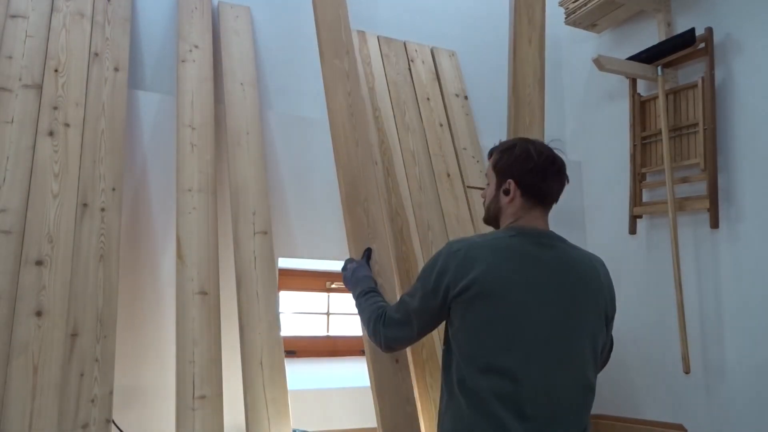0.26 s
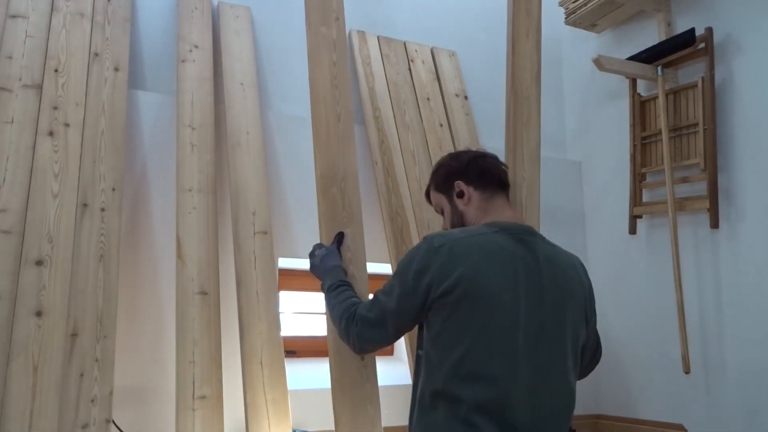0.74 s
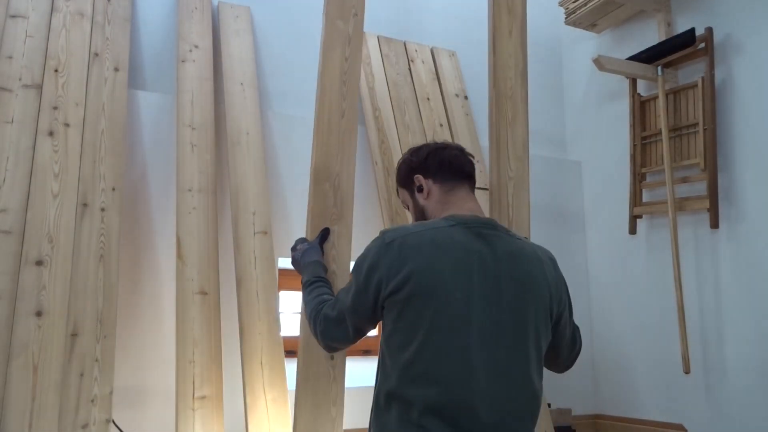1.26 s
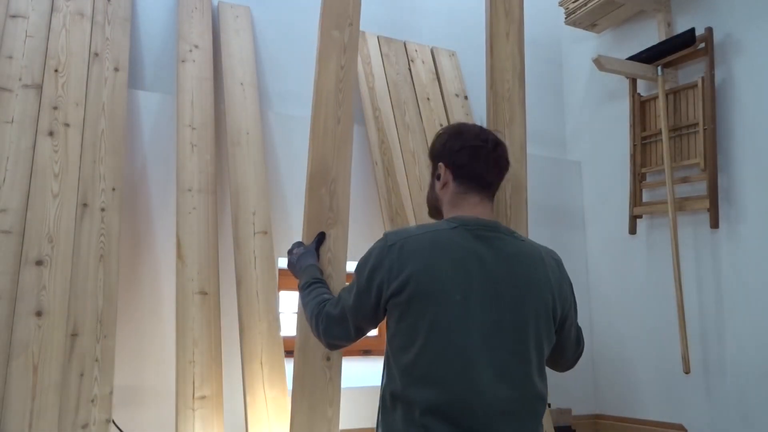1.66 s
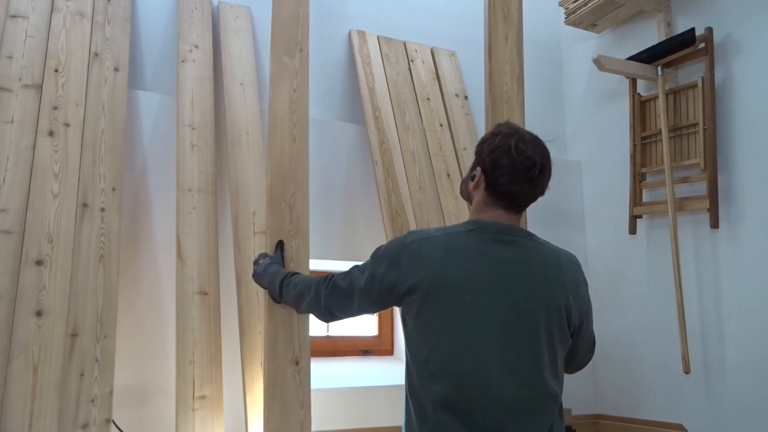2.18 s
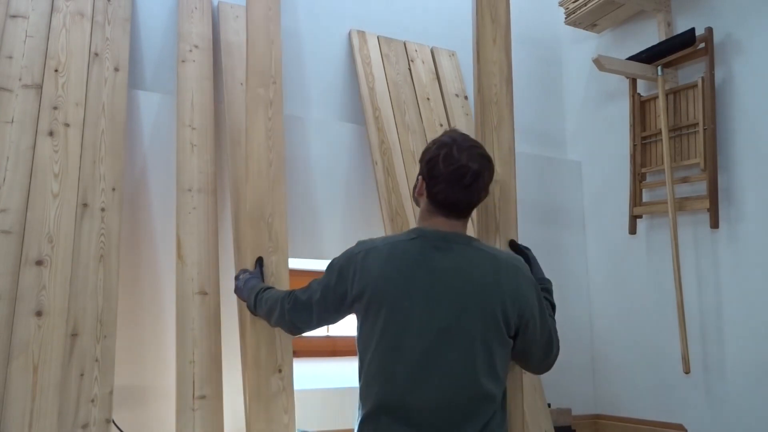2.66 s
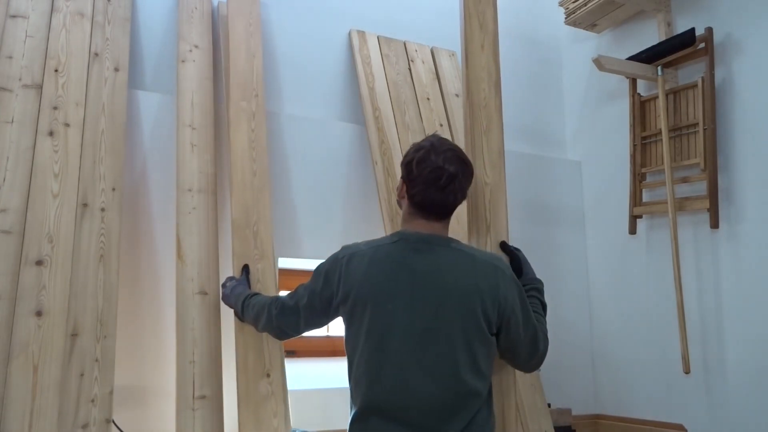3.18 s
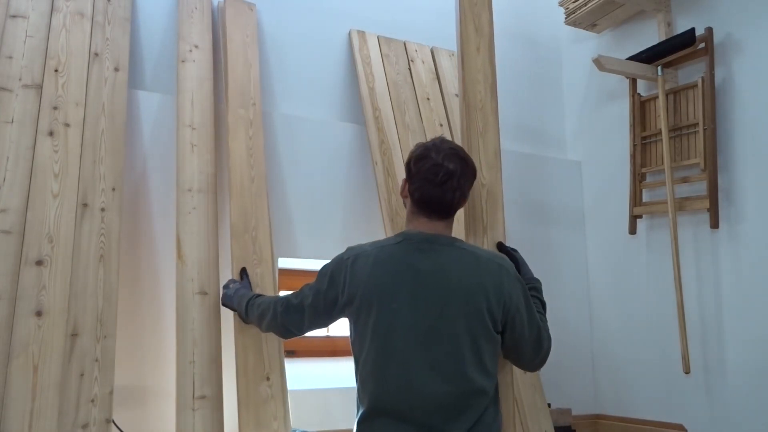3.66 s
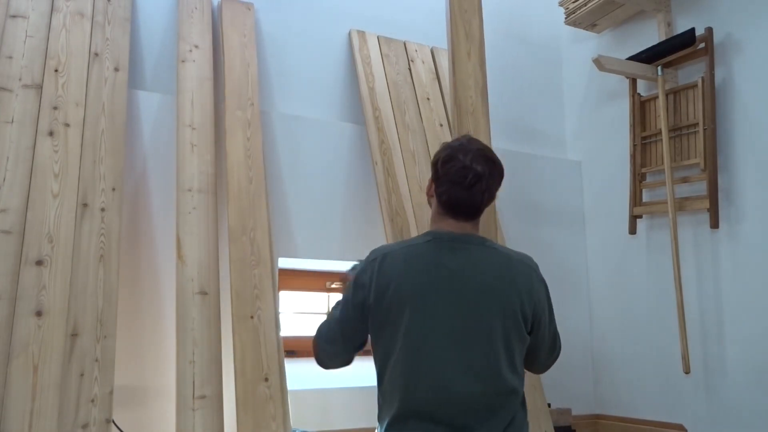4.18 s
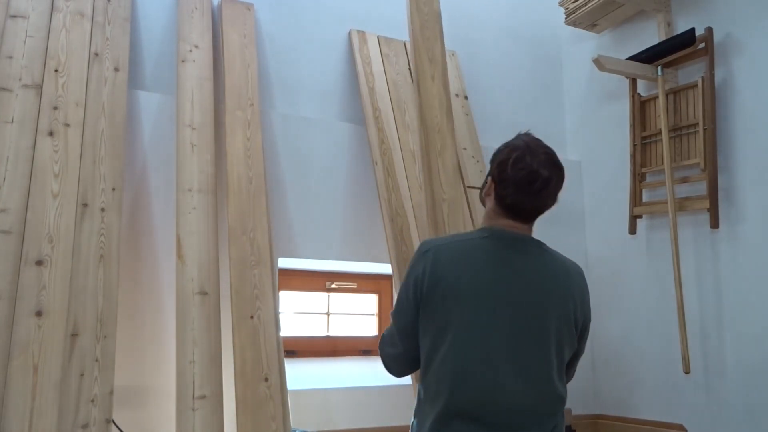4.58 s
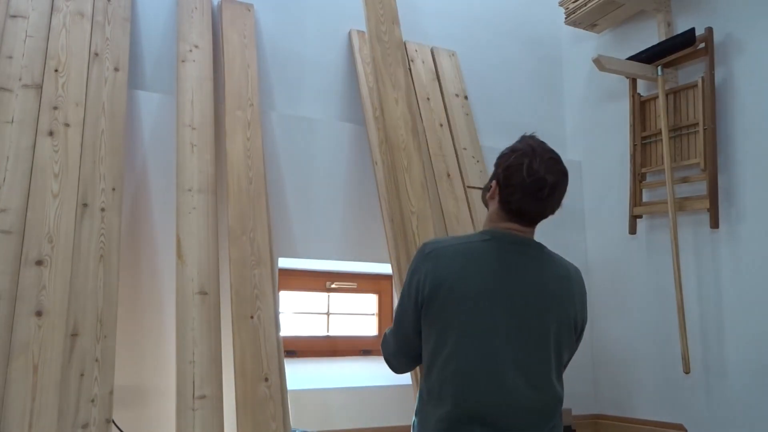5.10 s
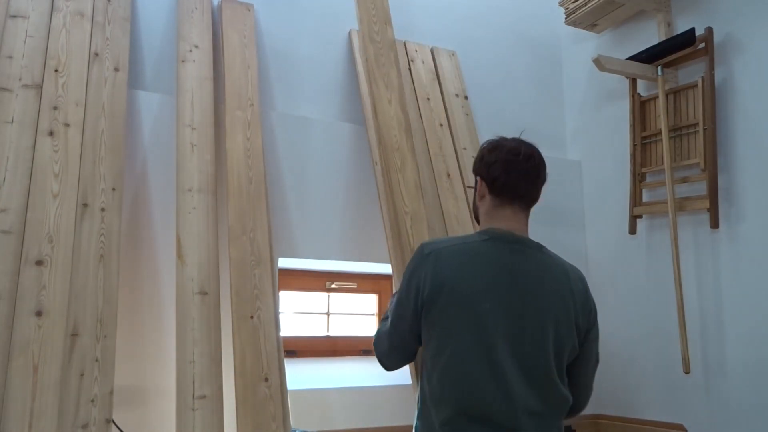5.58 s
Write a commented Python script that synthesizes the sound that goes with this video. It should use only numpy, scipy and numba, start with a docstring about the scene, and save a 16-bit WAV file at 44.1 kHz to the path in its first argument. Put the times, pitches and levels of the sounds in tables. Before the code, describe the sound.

Wooden planks bump, clatter and slide in a small room, loud knocks mixed with lighter taps, cloth rustle and soft microphone bumps.

```python
"""A small bare workshop: long softwood boards are lifted, slid and leant against a wall.
Each knock rings resonances of room and board and thuds in the floor; a low boom follows the loud ones.
Wood scrapes on wood; gloves and sleeves rustle. A hand-held camera adds rumble, bumps and ticks
over faint room noise, and its gain control holds the loudest knocks down."""
import sys
import numpy as np
from scipy import signal
from scipy.fft import rfft, irfft, next_fast_len
from scipy.io import wavfile
from scipy.ndimage import uniform_filter1d
from numba import njit

SR = 44100
rng = np.random.default_rng(int(sys.argv[2]) if len(sys.argv) > 2 else 0)


def int16_out(signal):
    """Quantize to a 16-bit WAV file."""
    q = np.round(np.clip(np.atleast_2d(signal).T, -1, 1) * 32767)
    wavfile.write(sys.argv[1], SR, q.astype(np.int16))


N = 257544
T = np.arange(N) / SR

# resonances of room and board: (frequency [Hz], level [dB], t60 [s])
RESONANCES = [(149, 3, 0.097), (190.8, -3, 0.088), (250.5, 6.5, 0.045), (337, -0.5, 0.056),
              (408.5, -2.5, 0.048), (554.6, 6, 0.024), (645, -0.5, 0.04), (715.4, -11.5, 0.093),
              (804, 0, 0.021), (830, 0.5, 0.013), (1036, 5, 0.015), (1063, 7, 0.011), (1220, 2, 0.024),
              (1416, -0.5, 0.031), (1381, -7, 0.029), (1586, 8.5, 0.014), (1809, 14, 0.0077),
              (2200, 1, 0.017), (3047, 5.5, 0.018), (3840, -32, 0.0063)]


def board_knocks(detune=0.026, burst_db=8, onset_s=0.0024, floor_onset_s=0.003):
    """A blow rings room and board, rough contact adds a burst, the floor thuds: (hits, floor)."""
    # (time [s], strength [dB], relative thud [dB], boom [dB], body [dB], clack [dB], crack [dB],
    #  contact decay [s])
    knocks = [(0.0, -25, -20, -7.5, -5, -15, -29, 0.008), (0.227, -39.5, -7, -2, -5.5, -26, -25, 0.018),
              (0.554, -45.5, -20, -20, -28, 7.5, -21, 0.0087),
              (0.72, -20, -1.5, 5, 5.5, -3.5, -11.5, 0.0067), (1.223, -26, 7.5, 12, -5, -9.5, -14.5, 0.012),
              (1.231, -12.5, 8.5, 8.5, 3.5, -15, -42.5, 0.021),
              (1.353, -3, -34, -14, -13, -25.5, -63, 0.012), (1.362, -5, -29, -12, -9, -14, -51, 0.0092),
              (1.399, -10.5, -18, -8.5, -3.5, -16.5, -57, 0.014),
              (1.511, -17, -26, -2, 0, -17, -42.5, 0.01), (1.599, -42.5, 5, 5, 15.5, -3, -32, 0.031),
              (2.312, -39.5, -12, -20, 20, -9, -9.5, 0.035), (2.602, -42.5, 4, 8.5, 7, -17, -19, 0.009),
              (2.749, -46.5, -9.5, -16, 14.5, -12, -20, 0.0056), (3.074, -48, -16, -7, 11, -2, -23, 0.014),
              (3.506, -18.5, -18, 1.5, -2, -6.5, -46.5, 0.0081), (3.535, -27, -19, 3.5, 7, -13, -28, 0.023),
              (3.855, -7, -28, -0.1, 1.5, 2.5, -27.5, 0.031), (4.829, -44, -15, 7, 11, -5, -9, 0.011),
              (4.861, -43, -20, 6.5, 9, 1, -7.5, 0.036), (5.171, -51, -11, -1, 0, -10, -18, 0.015)]
    # points of band_db: (frequency [Hz])
    band_hz = [70, 190, 420, 750, 1450, 3000, 3800, 4500, 6000, 8500, 10500, 15000]
    # floor modes under the board's foot: (frequency [Hz], level [dB], t60 [s])
    floor_modes = [(143, -15, 0.11), (184.2, 1.5, 0.46), (197.5, -2, 0.1)]
    floor_hz, floor_db, floor_t60 = np.transpose(floor_modes)
    thud = ring(floor_hz, undb(floor_db), floor_t60, .4)
    thud *= 1 - np.exp(-T[:len(thud)] / floor_onset_s)
    hz, db, t60 = np.transpose(RESONANCES)
    t = T[:int(.3 * SR)]
    onset = 1 - np.exp(-t / onset_s)  # a long edge lands gradually
    hits, floor = np.zeros((2, N))
    for time_s, strength_db, thud_db, boom, body, clack, crack, contact_s in knocks:
        shift, polarity = rng.standard_normal((len(hz), 2)).T
        modes = ring(hz * (1 + detune * shift), undb(db) * np.sign(polarity), np.maximum(t60, .01), .3)
        burst = undb(burst_db) * rng.standard_normal(len(t)) * np.exp(-t / contact_s)
        blow = (modes + burst) * onset
        # where and how hard it lands sets the spectrum
        edge = (clack + crack) / 2 + 1.5  # 3 kHz
        dust = crack + (crack - clack) - 0.2  # slope continued to 10.5 kHz
        band_db = [boom - 20, boom, body, 0, clack, edge, edge - 3,
                   crack - 2, crack, dust - 2, dust, dust - 12]
        add(hits, time_s, undb(strength_db - 4.5) * causal_filter(blow, band_hz, band_db))
        add(floor, time_s, undb(strength_db + thud_db) * thud)
    return hits, floor


def board_radiation(hits):
    """Direct path: a thin board radiates little bass."""
    # (frequency [Hz], gain [dB])
    response = [(150, -5), (500, -1.5), (1200, 1.4)]
    impulse = causal_filter(signal.unit_impulse(2048), *np.transpose(response))
    return signal.fftconvolve(hits, impulse)[:N]


def wood_scrape(ring_db=3):
    """Sliding grain catches unevenly and rings room and board: (mid, side)."""
    # (time when fullest [s], level [dB], swell [s per 20 dB], hold [s])
    slides = [(0.245, -47.5, .15, 0.0044), (0.426, -51.5, 0, 0.07), (0.58, -50.5, -0.7, .05),
              (1.1, -55.5, -0.8, 0.06), (1.21, -43.5, 0.23, 0.025), (2.056, -56, 0.3, 0.0058),
              (2.338, -35.5, -0.0939, 0.036), (2.608, -58.5, 0.9, 0.1), (2.758, -52.5, 0, 0.027),
              (3.36, -55, 0.04, 0.13), (3.455, -41, 0.1745, 0.68), (4.65, -59, -0.7, .12),
              (4.845, -46.5, -0.03, 0.09), (5.42, -54.5, -0.14, 0.15), (5.564, -49, -0.84, 0.0059)]
    # friction spectrum: (frequency [Hz], density [dB])
    spectrum = [(71, -72), (120, -2.5), (209, -8), (286, 0.5), (515, -6), (658, -12), (842, -11),
                (1060, -11.5), (2070, -20), (3600, -26), (4500, -33.5), (6000, -36), (7800, -76),
                (13200, -120)]
    hz, db, t60 = np.transpose(RESONANCES)
    impulse = np.diff(ring(hz, undb(db), t60, .15))
    pair = []
    for _ in range(2):
        friction = colour(grit(scatter_db=2.3), spectrum)
        ringing = signal.fftconvolve(friction, impulse)[:N]
        pair.append(unit(unit(friction) + undb(ring_db) * unit(ringing)))
    return np.array(pair) * stroke_envelope(slides) * undb(4 + 0.65 * flicker(rate_hz=30))


def cloth_rustle():
    """Gloves and sleeves rub with a smoother hiss: (mid, side)."""
    # (time when fullest [s], level [dB], swell [s per 20 dB], hold [s])
    strokes = [(0.252, -61.5, 0.5, .005), (0.554, -54, 0.42, 0.05), (0.884, -58, 0.35, .005),
               (1.215, -53.5, -0.16, .03), (1.41, -59.5, 1.2, .005), (1.8, -67.5, .2, 0.41),
               (1.99, -68, 0.9, 0.058), (2.07, -57.5, 0.3, 0.0046), (2.327, -46, -0.25, 0.019),
               (2.735, -64.5, 0.5, 0.19), (3.5, -60.5, 0.24, 0.13), (3.699, -53, 0.02, .005),
               (3.771, -51.5, -0.28, 0.12), (4.4, -67, 0, 0.077), (4.58, -58, 0.54, 0.16),
               (4.9, -51.5, .2, 0.0054), (5.4, -60.5, -0.6, 0.14), (5.534, -56, 0.47, 0.087)]
    # (frequency [Hz], density [dB])
    spectrum = [(350, -8), (600, -9), (669, 1), (716, -11), (1640, -2.5), (1860, -2), (4560, -12),
                (5290, -9), (8750, -14.5), (10400, -9), (15500, -32)]
    hiss = np.array([unit(colour(grit(scatter_db=2.1), spectrum)) for _ in range(2)])
    return hiss * stroke_envelope(strokes) * undb(5 + 0.21 * flicker(rate_hz=40))


def room_reverb(x, build_s=0.0035, late_below_hz=600):
    """Reflections build a diffuse tail, bass last, that decays band by band: (mid, side)."""
    # (frequency [Hz], t60 [s])
    decay_times = [(100, 0.54), (300, 0.47), (1000, 0.55), (3000, 0.54), (6000, 0.33), (12000, 0.22)]
    hz, t60 = np.transpose(decay_times)
    t = T[:int(.9 * SR)]
    noise = rfft(rng.standard_normal((2, len(t))))
    log_f = np.log(np.fft.rfftfreq(len(t), 1 / SR) + 1)
    tail = 0
    for k in range(len(hz)):
        band = irfft(noise * np.interp(log_f, np.log(hz), np.arange(len(hz)) == k), len(t))
        build = 1 - np.exp(-t / (build_s * (1 + late_below_hz / hz[k])))
        tail += band * build * np.exp(-np.log(1000) * t / t60[k])
    tail /= np.sqrt(np.sum(tail[0] ** 2))
    return signal.fftconvolve(x[None], tail, axes=1)[:, :N]


def rumble_and_boom(flicker_db=2.5):
    """Handling rumble, plus a low boom that swells after the loud board knocks."""
    # (time [s], rumble [dB], boom [dB])
    levels = [(0.0, -30.5, -44), (0.23, -31.5, -46.5), (0.62, -27, -49.5), (0.85, -31.5, -55),
              (1.12, -39, -45.5), (1.22, -22.5, -43), (1.6, -31, -34.5), (2.08, -27, -51), (2.42, -35, -38),
              (2.64, -31, -44.5), (3.25, -39.5, -44), (3.58, -35, -31), (3.8, -39, -46), (3.95, -32, -29),
              (4.3, -47, -53.5), (5.0, -39.5, -66), (5.5, -43, -59), (5.84, -41, -56)]
    time_s, rumble_db, boom_db = np.transpose(levels)
    rumble = shaped_noise([(9, -1.5), (14.5, 18), (21, 6), (35, 5.5), (60, -3), (100, -9),
                           (200, -60), (1000, -110)])
    boom = shaped_noise([(70, 13), (110, 16), (235, 13), (320, -6), (600, -56), (2000, -110)])
    rumble *= undb(np.interp(T, time_s, rumble_db) + flicker_db * flicker(rate_hz=24.94))
    boom *= undb(np.interp(T, time_s, boom_db) + flicker_db * flicker(rate_hz=30))
    return rumble + boom


def hand_jolts():
    """Each jolt of the camera is a pressure hump with a dip on either side."""
    # (time [s], peak [dB], width [s])
    jolts = [(0.581, -23, 0.013), (1.209, -21, 0.0084), (1.814, -23.5, 0.011), (1.916, -22, 0.0094),
             (2.059, -13, 0.016), (2.221, -17.5, 0.0093), (2.29, -19, 0.0071), (2.311, -17.5, 0.0068),
             (2.569, -19, 0.0055), (2.69, -21, 0.0051), (2.763, -18.5, .024), (3.139, -19.5, 0.0069),
             (3.628, -22, 0.0075), (4.985, -33, 0.004), (5.702, -25.5, 0.007)]
    time_s, peak_db, width_s = np.transpose(jolts)[:, :, None]
    u = ((T - time_s) / width_s) ** 2
    return np.sum(undb(peak_db) * (1 - 2 * u) * np.exp(-u), axis=0)


def finger_bumps(push_s=0.00355):
    """A soft fingertip pushes the camera housing and rings its low modes."""
    # (time [s], level [dB])
    bumps = [(1.091, -67), (1.85, -46), (1.896, -33), (1.969, -41), (2.046, -36.5), (2.164, -36),
             (2.202, -42.5), (2.905, -30.5), (2.981, -29.5), (3.009, -29), (3.046, -30), (3.079, -30),
             (3.132, -44), (3.231, -36.5), (3.312, -38.5), (4.989, -44), (5.624, -41), (5.689, -64)]
    # (frequency [Hz], level [dB], t60 [s])
    housing_modes = [(67, 2.5, 0.044), (229.5, -1, 0.058)]
    hz, db, t60 = np.transpose(housing_modes)
    push = np.hanning(int(push_s * SR))
    bump = np.convolve(push / push.sum(), ring(hz, undb(db), t60, .15))
    out = np.zeros(N)
    for time_s, level_db in bumps:
        add(out, time_s, -undb(level_db + 11) * bump)
    return out


def plastic_ticks():
    """The housing ticks, three short modes each time."""
    # (time [s], level [dB], top mode [Hz])
    ticks = [(0.5612, -43, 5500), (0.635, -45, 5290), (0.6414, -53, 5500), (0.6507, -44.5, 5600),
             (0.6616, -59, 3130), (0.885, -54.5, 10800), (1.1994, -52, 5300), (5.22, -59, 620),
             (5.242, -50, 560), (5.7443, -60, 4080), (2.168, -56, 1910)]
    ratios, gains, t60 = np.array([1, .49, .139]), undb([0, -8, -9]), np.array([.008, .012, .025])
    out = np.zeros(N)
    for time_s, level_db, hz in ticks:
        add(out, time_s, undb(level_db + 13.5) * ring(hz * ratios, gains, t60, .04))
    return out


def room_noise(level_db=-57):
    """Faint steady background: (mid, side)."""
    # (frequency [Hz], density [dB])
    spectrum = [(59, -37), (100, -33), (264, -4), (879, -12), (1730, -19.5), (3320, -23), (4370, -27),
                (5400, -25.5), (10400, -30.5), (15500, -31)]
    return np.array([shaped_noise(spectrum) for _ in range(2)]) * undb(level_db)


def stroke_envelope(strokes, fade_db_per_s=112, min_swell_s=.005):
    """Each stroke swells, holds and fades; powers add."""
    time_s, db, swell_s, hold_s = np.transpose(strokes)[:, :, None]
    before_db = 20 * np.maximum(time_s - T, 0) / np.maximum(swell_s, min_swell_s)
    after_db = fade_db_per_s * np.maximum(T - time_s - hold_s, 0)
    return np.sqrt(np.sum(undb(np.maximum(db - before_db - after_db, -120)) ** 2, axis=0))


def ring(hz, gain, t60, length_s):
    """Sum of decaying modes starting from rest."""
    t = T[:int(length_s * SR)]
    decay = np.exp(-np.log(1000) * t / t60[:, None])
    return (gain[:, None] * decay * np.sin(2 * np.pi * hz[:, None] * t)).sum(axis=0)


def grit(scatter_db):
    """Dense micro-impacts: most small, a few standing out."""
    return unit(rng.standard_normal(N) * undb(scatter_db * np.minimum(rng.exponential(size=N), 3.1)))


def flicker(rate_hz):
    """Random levels joined by ramps, unit RMS."""
    step = int(SR / rate_hz)
    held = np.repeat(rng.standard_normal(N // step + 1), step)
    return unit(uniform_filter1d(held, step)[:N])


def shaped_noise(spectrum):
    """Unit-RMS noise through (Hz, dB) points."""
    return unit(colour(rng.standard_normal(N), spectrum))


def bin_gains(size, hz, db):
    """FFT gains from points joined on a log-frequency axis."""
    log_f = np.log(np.maximum(np.fft.rfftfreq(size, 1 / SR), 1))
    return undb(np.interp(log_f, np.log(hz), db))


def colour(x, points):
    """Zero-phase filter through (Hz, dB) points."""
    size = next_fast_len(len(x))
    return irfft(rfft(x, size) * bin_gains(size, *np.transpose(points)), size)[:len(x)]


def causal_filter(x, hz, db):
    """Minimum phase by folded cepstrum: nothing sounds ahead of the blow."""
    size = next_fast_len(2 * len(x))
    cepstrum = irfft(np.log(bin_gains(size, hz, db)), size)
    cepstrum[1:size // 2] *= 2
    cepstrum[size // 2 + 1:] = 0
    return irfft(rfft(x, size) * np.exp(rfft(cepstrum)), size)[:len(x)]


@njit
def follow(x, attack_s, release_s):
    """Envelope with separate rise and fall times."""
    attack, release = 1 / (attack_s * SR), 1 / (release_s * SR)
    level, out = 0., np.empty(len(x))
    for i in range(len(x)):
        level += (x[i] - level) * (attack if x[i] > level else release)
        out[i] = level
    return out


def add(out, time_s, x):
    i = int(time_s * SR)
    out[i:i + len(x)] += x[:len(out) - i]


def undb(db):
    return 10 ** (np.asarray(db) / 20)


def unit(x):
    return x / np.sqrt(np.mean(x ** 2))


def scene(wall_delay_s=0.0099):
    """A close microphone pair: both hear mid, boom and handling; side sets them apart."""
    # stereo width: (frequency [Hz], side gain [dB])
    width = [(60, -29), (150, -25), (500, -13), (2000, -12.5), (5000, -12.5), (9000, -19), (13000, -15)]
    # slightly brighter right microphone: (frequency [Hz], gain [dB])
    right_response = [(2000, 0.5), (4000, 0.05), (9000, 1.5), (12500, -0.2)]
    hits, floor = board_knocks()
    direct = board_radiation(hits)
    background = room_noise()
    wall_echo = np.roll(direct + undb(4.5) * floor, int(wall_delay_s * SR))  # side wall answers first
    early = np.array([undb(3) * direct + floor, undb(2.5) * wall_echo])
    mid, side = early + undb(7) * room_reverb(hits) + wood_scrape() + cloth_rustle() + background
    side = colour(side, width)
    mono = rumble_and_boom() + hand_jolts() + finger_bumps() + plastic_ticks()
    return np.array([mid + side, colour(mid, right_response) - side]) + mono


def record(dry, threshold_db=-14, ratio=1.64, ceiling=0.85, cutoff_hz=15655):
    """Look-ahead gain control turns loud knocks down; peaks round off; a steep low-pass cuts the top."""
    ahead = int(.001 * SR)
    envelope = follow(np.abs(dry).max(axis=0), attack_s=.002, release_s=.025)
    gain = np.minimum(undb(threshold_db) / (envelope + 1e-9), 1) ** (1 - 1 / ratio)
    gain = np.append(gain[ahead:], np.full(ahead, gain[-1]))
    rounded = ceiling * np.tanh(dry * gain / ceiling)
    return signal.sosfilt(signal.ellip(16, .3, 90, cutoff_hz, fs=SR, output="sos"), rounded)


dry = scene()
out = record(dry)
int16_out(out)
```